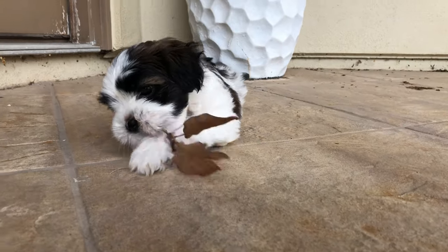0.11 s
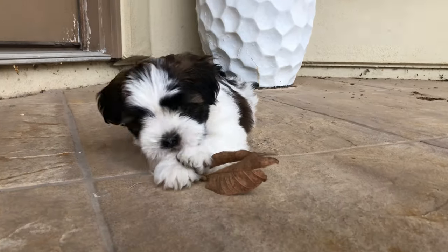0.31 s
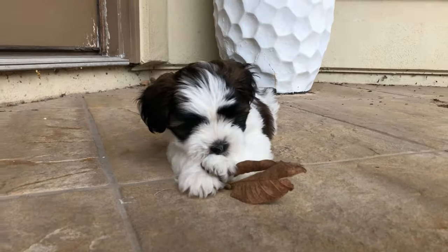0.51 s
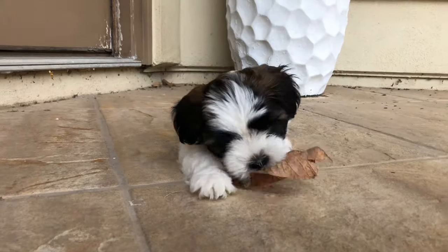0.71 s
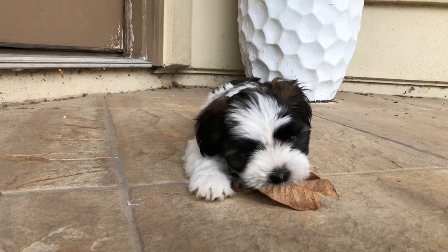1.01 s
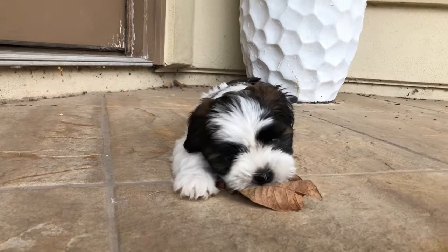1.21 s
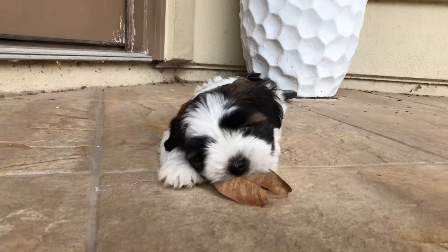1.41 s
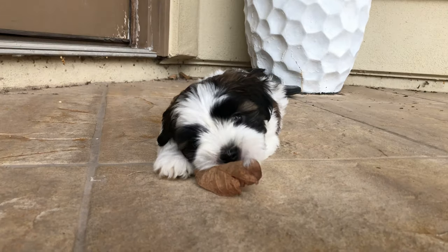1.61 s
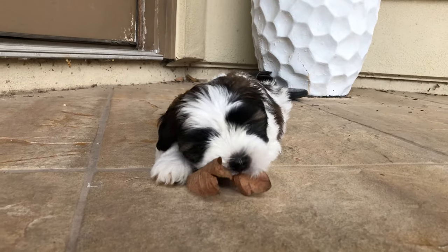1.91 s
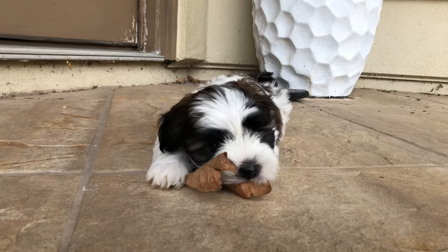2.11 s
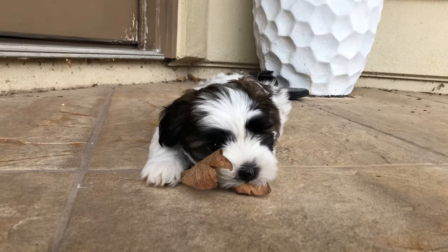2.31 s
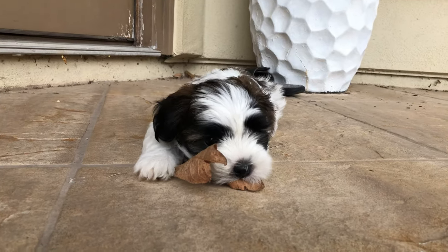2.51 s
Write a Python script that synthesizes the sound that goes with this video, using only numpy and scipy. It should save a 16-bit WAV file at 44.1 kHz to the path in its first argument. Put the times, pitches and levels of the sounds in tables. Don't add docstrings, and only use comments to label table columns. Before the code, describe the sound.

A puppy bites a brittle dry leaf, close on a tiled porch. Tiny ticks lead to a hard snap with hollow knocks at 0.25 s, another crack at 0.74, a sharp cluster around 1.0, dense crunching and crumbling from 1.2 to 1.75, dull gnawing near 2.0, then light nibbles at 2.3. Faint insect buzz, hum and hiss continue throughout; a distant bird whistles near 0.9 and 2.1-2.5.

```python
import sys
import numpy as np
from scipy import signal
from scipy.fft import rfft, irfft
from scipy.io import wavfile
from scipy.ndimage import uniform_filter1d

SR = 44100
rng = np.random.default_rng(int(sys.argv[2]) if len(sys.argv) > 2 else 0)


def makeup_ratio(level_db):
    decades = np.asarray(level_db, float) / 20
    return 10 ** decades


def wrap_up_sound(samples):
    columns = np.atleast_2d(samples).T
    tamed = np.clip(columns, -1, 1)
    steps = np.round(tamed * 32767).astype(np.int16)
    wavfile.write(sys.argv[1], SR, steps)


N = 116865


def level(x, db):
    return x * makeup_ratio(db) / np.sqrt(np.mean(x ** 2))


def shape(table, hz):
    f, db = np.array(table, float).T
    log_hz = np.log(np.maximum(hz, 1))
    return makeup_ratio(np.interp(log_hz, np.log(f), db, left=db[0] - 24.0, right=db[-1] - 24.5))


def colour(x, table):
    hz = np.arange(len(x) // 2 + 1) * SR / len(x)
    return irfft(rfft(x) * shape(table, hz), len(x))


def ring(x, hz, width):
    hz = min(hz, .4 * SR)
    return signal.lfilter(*signal.iirpeak(hz, max(hz / width, .3), fs=SR), x)


def walk(rate):
    k = int(SR / rate)
    w = uniform_filter1d(uniform_filter1d(rng.standard_normal(N), k), k)
    return w / w.std()


# f/Hz, level/dB
INSECT_BODY = [(5560, -4.5), (6110, -2), (6630, -7), (7140, 1.5), (7660, -2.5), (8120, -5), (8550, -4),
               (9050, -3), (9400, -2.5), (10150, 0.5), (10500, 1), (11200, -4)]
# t/s, level/dB
INSECT_TURN = [
    (0, -6.5),
    (.3, -3.5),
    (.5, 0),
    (.9, -1.5),
    (2.2, -4),
    (2.65, -8.5),
]


def insect():
    click_hz, throb_hz = 253.6, 70.5
    odd_db = -4
    wobble_rad, throb_depth = .05, .5
    t = np.arange(N) / SR
    partial = np.arange(18, 47)[:, None]
    start, throb_lag = 2 * np.pi * rng.random((2, len(partial), 1))
    throb = 2 * np.pi * throb_hz * t + throb_lag
    phase = 2 * np.pi * click_hz * t + 0.028 * walk(2.8)
    phase = phase + wobble_rad * np.sin(throb + np.sin(2 * np.pi * rng.random((len(partial), 1))))
    strength = makeup_ratio(odd_db * (partial % 2)) * np.exp(throb_depth * np.cos(throb))
    clicks = np.sum(strength * np.sin(partial * phase + start), axis=0)
    echoes = rng.standard_normal(2048) * np.exp(-t[:2048] / .012)
    clicks = signal.fftconvolve(clicks, echoes, "same")
    turn = np.interp(t, *np.array(INSECT_TURN).T)
    buzz = np.zeros(N)
    for hz, db in INSECT_BODY:
        side = (hz > 9800) - 1. * (8800 < hz < 9800)
        band = ring(ring(clicks, hz, hz / 40), hz, hz / 20)
        buzz += makeup_ratio(db + 2.5 * walk(3.3) + turn * side) * level(band, 0)
    return level(buzz, -55.5)


# f/Hz, level/dB per Hz
HUM_SPECTRUM = [(16, -41), (28, -4.5), (117, -1), (623, -8), (1330, -21), (2550, -21), (5000, -27),
                (6500, -42), (11000, -120)]
# f/Hz, level/dB per Hz
HISS_SPECTRUM = [(4000, -52), (5500, -15), (7000, -8), (8200, -10), (10500, -6), (11500, -22), (12300, -29),
                 (16000, -24)]


def air():
    hum = level(colour(rng.standard_normal(N), HUM_SPECTRUM), -52.5)
    hiss = level(colour(rng.standard_normal(N), HISS_SPECTRUM), -56.5)
    return hum * makeup_ratio(.8 * walk(3)) + hiss * makeup_ratio(.5 * walk(6.6))


# f/Hz, width/Hz
LEAF_PARTS = ((1350, 750), (3400, 1700), (9500, 9000))


def leaf(s, env, db, body_db, edge_db, fold=0.):
    scatter_oct, grain_s, splinter_db = 0.17, 0.0016, 3
    tile = 0.46
    noise = rng.standard_normal((4, len(env)))
    tune = scatter_oct * rng.standard_normal(3) + fold * np.array([1, 1, 0])
    grain = uniform_filter1d(noise[3], max(int(grain_s * SR), 2))
    burst = noise[:3] * makeup_ratio(splinter_db * grain / grain.std()) * env
    echo_lag = int(12 + 6 * np.tanh(noise[3, 0]))
    gains = makeup_ratio(db + np.array([min(body_db, 5), 0, edge_db]))
    sound = np.zeros(len(env))
    for k, (hz, width) in enumerate(LEAF_PARTS):
        part_hz = hz * 2 ** tune[k]
        part = ring(ring(burst[k], part_hz, width), part_hz, 2 * width)
        fold_hz = hz * 2 ** (tune[k] + 0.42 * np.tanh(noise[k, 0]))
        part = part + 0.29 * ring(part, fold_hz, width / 5)
        part = part + tile * np.roll(part, echo_lag)
        sound += gains[k] * part * np.sqrt(np.sum(env ** 2) / np.sum(part ** 2))
    return int(s * SR), sound


# t/s, peak level/dB, dull body re blade/dB, bright edge re blade/dB, pitch of the fold/octaves
GRAB_SNAPS = [(.038, -39, -27, 3.5, 0.049), (0.0542, -25.5, -27, -12.5, -1.03), (.07, -40, -18, 1, -0.18),
              (.121, -34.5, -14, -8, -0.11), (0.1555, -33.5, -18, 1, 0.65), (.217, -31, -26, -15, -0.82),
              (0.2552, 0, -31, -16, 0.33), (0.2575, -4.5, -19, -6.5, -0.3), (.26, -13, -15.5, -18, -0.91),
              (.265, -14, -26, -10, 0.52), (0.2876, -20, -14, -17, -0.73), (0.3175, -18.5, -14, -23, -0.72),
              (0.7356, -10.5, -14, -19.5, -0.13), (.748, -30, -27, -1, 0.34), (0.7602, -28, -21, -6, -0.7),
              (.776, -29, -11, -7, -0.51), (0.8118, -25, -19, -23, -0.4), (0.826, -23, -12, -21, -0.35),
              (0.9554, -30, -14, -9, 0.045), (0.9906, -7.5, -33, -17.5, 0.16),
              (0.9991, -13, -16, -10, -0.046), (1.0039, -11.5, -11, -0.5, 0.15),
              (1.0108, -2, -26, -17, 0.93), (1.0142, -2, -24, -16, -0.097), (1.045, -26.5, -22, -0.5, 0.46),
              (1.0586, -13.5, -40, -13, 0.11)]
CRUSH_SNAPS = [(1.1668, -28, -5, -26, 0), (1.2125, -21, -29, -15, -0.26), (1.232, -24, -14, -6, 0.07),
               (1.2739, -20, -21, -8, 0.099), (1.2786, -19.5, -27, -15, -0.14),
               (1.2934, -25, -2, -24, 0.22), (1.2986, -18, -27, -18, 0.17), (1.3044, -14, -20, -15, -0.077),
               (1.312, -30, -6, -16, 0.15), (1.3539, -6.5, -22, -26, 0.13), (1.3549, -13, -31, -14, 0.25),
               (1.364, -13.5, -21, -23, -0.28), (1.3736, -16, -40, -8, -0.26),
               (1.409, -13, -19, -11, -0.15), (1.412, -17, -15, -8, .3), (1.417, -16, -19, -13, -0.37),
               (1.4431, -20, -11, -12, -0.25), (1.4575, -15, -16, 3, 0.24), (1.4718, -14, -28, -7, -0.19),
               (1.481, -22, -25, 1, 0), (1.4864, -15.5, -15, -0.5, -0.032), (1.4962, -9, -28, -9, -0.047),
               (1.531, -19, -16, -4, 0.85), (1.6003, -22, -22, -20, -0.15), (1.6153, -10, -28, -10, -0.34),
               (1.7321, -25, -28, -11, -0.25), (1.7429, -23.5, -45, -13, -0.23),
               (1.7484, -22, -24, -6, -0.35), (1.7825, -30.5, -22, 4, 0), (1.8854, -33.5, -4.5, 1.5, 0.17)]
GNAW_SNAPS = [(1.9438, -30.5, 9, -20, 0), (1.949, -30, -2.5, -11, 0.34), (1.9518, -22.5, -10, -13, 0.053),
              (1.9636, -26.5, -2, -18, 0.11), (1.97, -29, -4, -12, 0.11), (1.9848, -24.5, 1.5, -15, 0),
              (2.005, -24, 1, 0.5, 0.027), (2.01, -21.5, -11, -7, 0), (2.0166, -20.5, 0, -9, 0.098),
              (2.0226, -21.5, -2, -6, 0), (2.027, -20, -2, -5, 0.16), (2.032, -22, -3, -7.5, 0),
              (2.0375, -22.5, -3, -0.5, 0.011), (2.044, -36, -2, 0, 0.014), (2.05, -28, 0, -12, 0.15),
              (2.0535, -26, 0, -10, 0), (2.058, -27, -4, -6, 0.25), (2.0657, -20.5, -2, -16, 0.16),
              (2.0913, -25.5, -14, -6.5, 0.027), (2.1275, -33, -9, -12, 0.17), (2.177, -34, -4, -18, .2)]
NIBBLE_SNAPS = [(2.2085, -27, -17, -25, 0.23), (2.285, -34, 1, -11, 0.22), (2.312, -17.5, -12, 4, 0.58),
                (2.34, -33, -31, 2, -0.063), (2.367, -33, -28, -6, -0.087), (2.3765, -20, -32, 1.5, -0.52),
                (2.3865, -24, -40, -3.5, -0.24), (2.397, -23, -38, -5, -0.28), (2.4284, -37, -31, 4, -0.14),
                (2.4417, -33.5, -35, 2.5, 0), (2.53, -34, -21, -15, -0.099),
                (2.548, -34.5, -22, -20, -0.028)]


def snaps():
    rise_s, fall_s, loud_longer = .0006, .0008, .2
    after_s, after_db = .003, -20
    body_db, blade_db, edge_db = 11, -11, 9
    size = 4096
    out, t = np.zeros(N + size), np.arange(size) / SR
    for s, db, body, edge, fold in GRAB_SNAPS + CRUSH_SNAPS + GNAW_SNAPS + NIBBLE_SNAPS:
        fall = fall_s * makeup_ratio(loud_longer * (db + 0.5))
        decay = np.exp(-t / fall) + makeup_ratio(after_db) * np.exp(-t / after_s)
        env = np.minimum(t / rise_s, 1) ** 2 * decay
        i, sound = leaf(s, env / env.max(), db + blade_db, body + body_db, edge + edge_db, fold)
        out[i:i + size] += sound
    return out[:N]


# t/s, length/ms, rms
# level/dB, dull body re blade/dB, bright edge re blade/dB
CRUMBLES = [(0.2379, 3.9, -25.5, -2.5, 2), (.256, 21, -29, -7.5, -6.5), (0.311, 13, -40, 0, -4),
            (0.327, 20.2, -37.5, -3, 1.5), (.345, 29, -49.5, -1.5, -7), (.675, 24, -47.5, 3, -2),
            (0.705, 11, -42, -18, -5), (0.719, 7.6, -44.5, -4, -2), (.745, 13, -37, 2.5, -5),
            (.76, 84, -58, 0.5, -4), (0.785, 13, -37, -1.5, 4.5), (.822, 14, -45.5, 5, -19),
            (.967, 9.8, -39.5, -0.5, -0.5), (1.011, 31, -41, -7.5, 0.5), (1.051, 13, -43, 0, -11),
            (1.184, 17, -46.5, -6, -10), (1.335, 7.2, -25.5, -12, -0.5), (1.342, 25.3, -33.5, -5, 5),
            (1.389, 6.3, -20, -15.5, -0.5), (1.423, 8.4, -29, -14, -5),
            (1.454, 10, -20, -9.5, -16),
    (1.467, 44, -31, -8, -11),
    (1.525, 7.7, -26, 0, -2),
    (1.534, 15.6, -40.5, -9, -6),
    (1.6, 24.4, -38, -1.5, 0),
    (1.633, 42, -47.5, -0.5, -6),
    (1.667, 12.6, -38.5, -1.5, -4),
    (2.014, 61, -42.5, 2, -6),
    (2.07, 140, -60, -6, -2),
    (2.202, 30, -48, -5, -6),
]


def crumbles():
    swell = 0.33
    size = 4096
    out, t = np.zeros(N + size), np.arange(size) / SR
    for s, ms, db, body_db, edge_db in CRUMBLES:
        u = t / (ms / 1000)
        env = np.minimum(u / swell, 1) * np.exp(-np.maximum(u - swell, 0) ** 2 / 0.32)
        i, sound = leaf(s, env, db, body_db, edge_db)
        out[i:i + size] += sound
    return out[:N]


# t/s, ring/ms, f/Hz, level/dB
KNOCKS = [
    (.2385, 5.3, 910, -32),
    (.256, 15, 520, -37),
    (.318, 10, 630, -40.5),
    (.335, 12, 1000, -36),
    (1.012, 6.5, 500, -35),
    (1.459, 16, 490, -41.5),
    (2.312, 3.9, 1130, -29.5),
]


def knocks():
    out, t = np.zeros(N), np.arange(2048) / SR
    for s, ms, hz, db in KNOCKS:
        env = np.minimum(t / .001, 1) * np.exp(-t / (ms / 1000))
        sound = ring(ring(rng.standard_normal(len(t)) * env, hz, 2.0 * hz), hz, hz)
        sound *= np.sqrt(np.sum(env ** 2) / np.sum(sound ** 2))
        i = int(s * SR)
        out[i:i + len(t)] += makeup_ratio(db) * sound
    return out


# t/s, length/s, start f/Hz, end f/Hz, level/dB
BIRD_NOTES = [
    (0.834, 0.23, 3480, 3760, -54.5),
    (1.075, 0.13, 3720, 3580, -63),
    (2.059, 0.071, 4830, 4720, -54),
    (2.203, 0.14, 4430, 4120, -51),
    (2.322, 0.18, 3365, 3130, -58),
]


def bird():
    out = np.zeros(N)
    wobble_hz = 25 * walk(200)
    for s, length, from_hz, to_hz, db in BIRD_NOTES:
        u = np.linspace(0, 1, int(length * SR))
        hz = from_hz + (to_hz - from_hz) * u + wobble_hz[:len(u)]
        tone = np.sin(2 * np.pi * np.cumsum(hz) / SR)
        i = int(s * SR)
        out[i:i + len(u)] += makeup_ratio(db + 3) * np.sin(np.pi * u ** 0.64) ** 2.2 * tone
    return out * makeup_ratio(2 * walk(80))


def porch(x):
    t60_s, porch_db, size = .15, -22, 8192
    t = np.arange(size) / SR
    tail = ring(rng.standard_normal(size), 1870, 1800) * makeup_ratio(-60 * t / t60_s) * (t > .003)
    tail = level(tail, porch_db) / np.sqrt(size)
    return signal.fftconvolve(x, tail)[:N]


def scene():
    background = insect() + air()
    bites = snaps() + crumbles() + knocks()
    return (background + bites + porch(bites) + bird())[None]


def roll_off(x):
    return signal.sosfilt(signal.butter(12, 16980, fs=SR, output="sos"), x)


def record(dry):
    rounded = np.tanh(dry - uniform_filter1d(dry, size=1200))
    top_cut = signal.ellip(6, .2, 30, 15800, fs=SR, output="sos")
    mix = signal.sosfilt(top_cut, rounded)
    return roll_off(mix)


dry = scene()
out = record(dry)
wrap_up_sound(out)
```